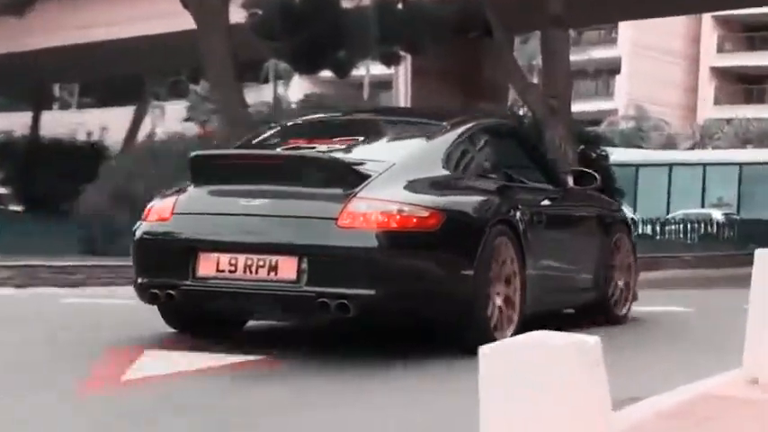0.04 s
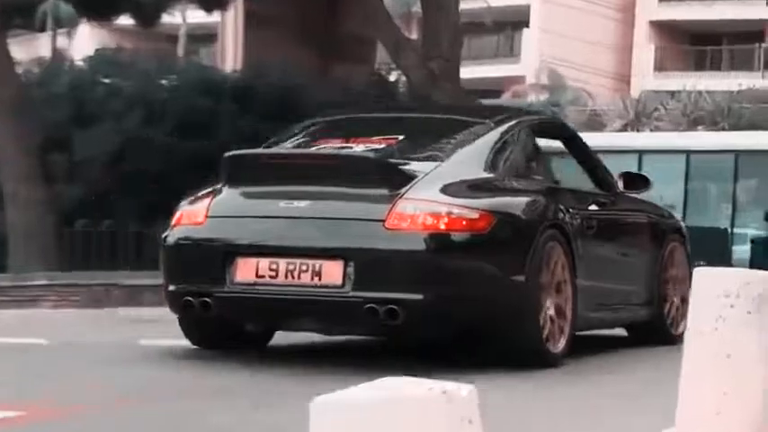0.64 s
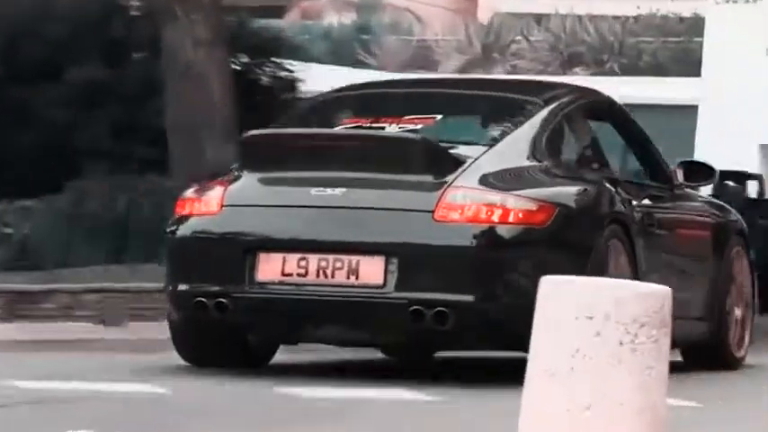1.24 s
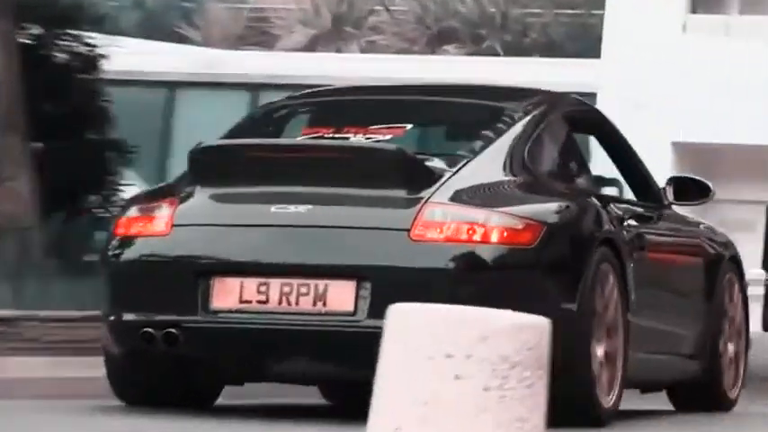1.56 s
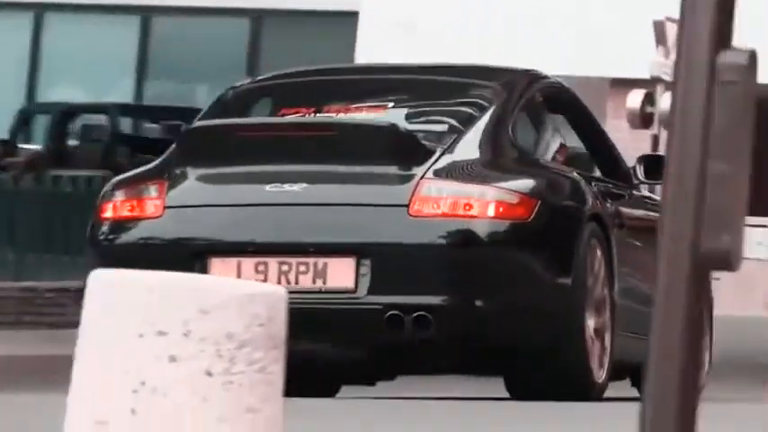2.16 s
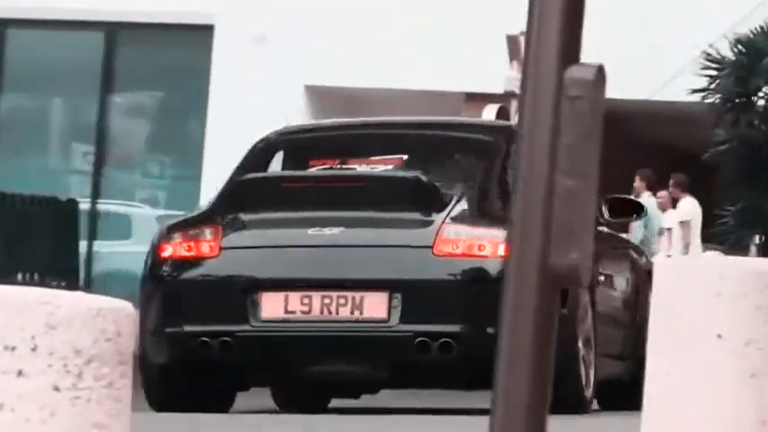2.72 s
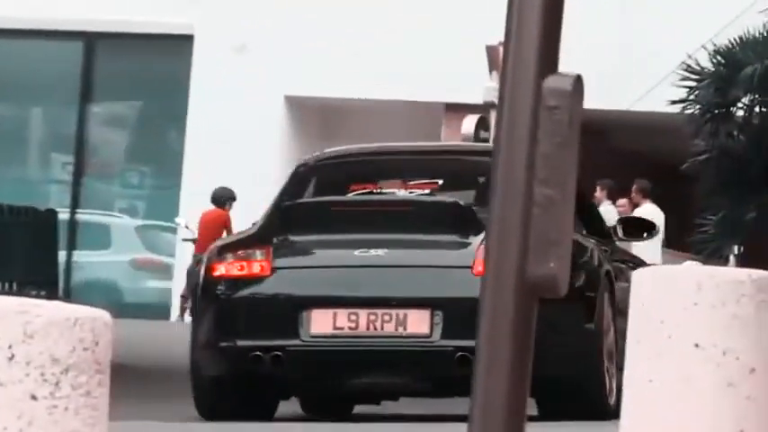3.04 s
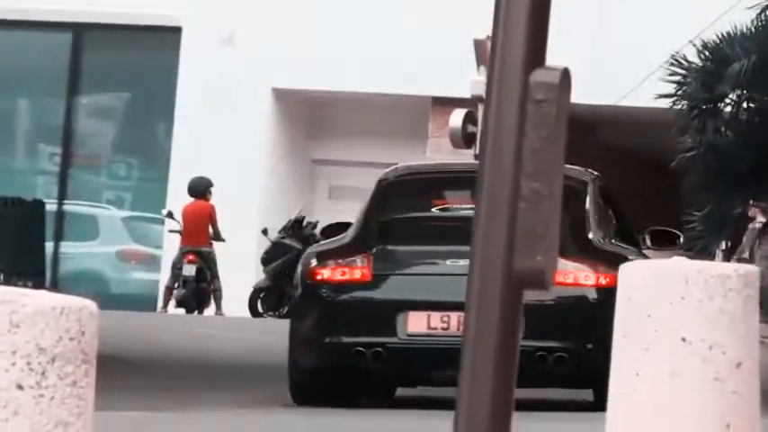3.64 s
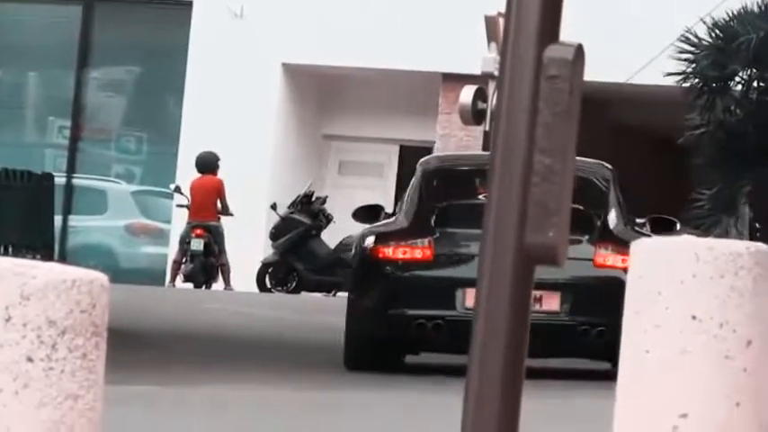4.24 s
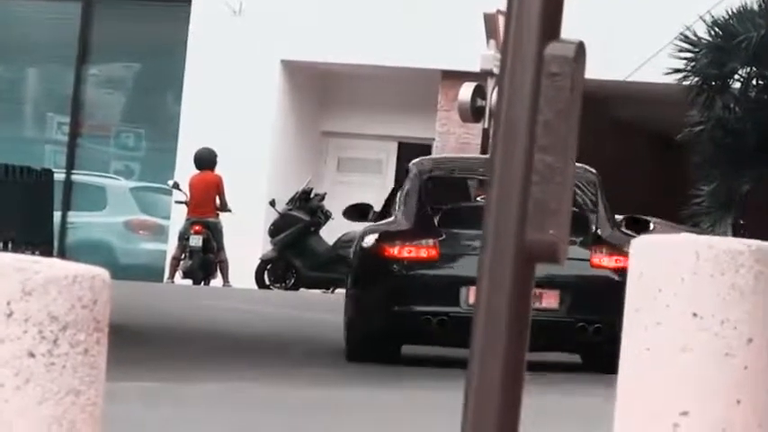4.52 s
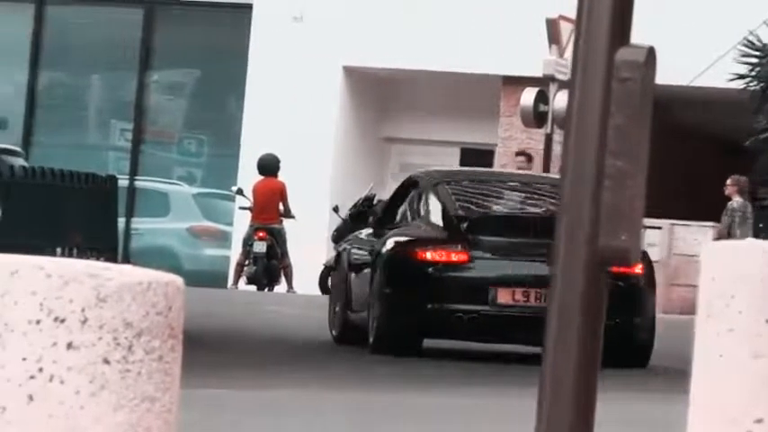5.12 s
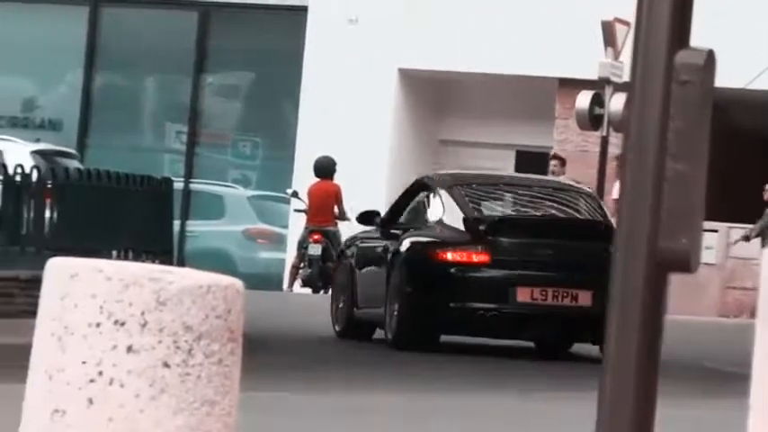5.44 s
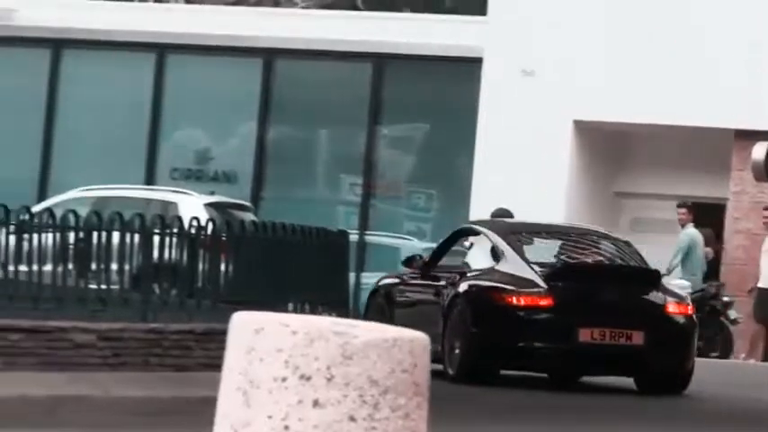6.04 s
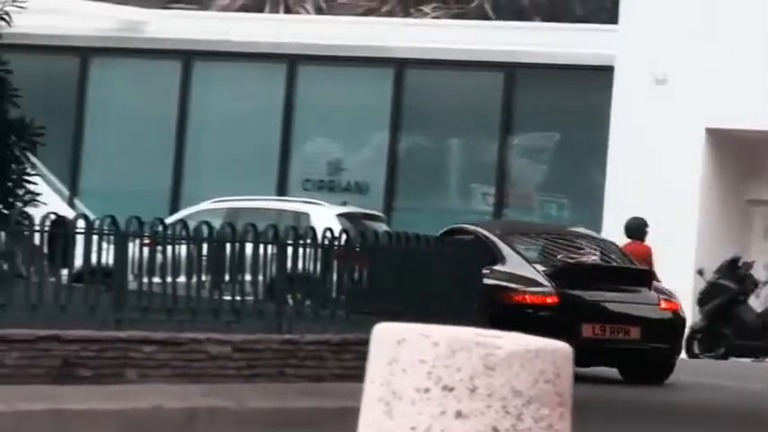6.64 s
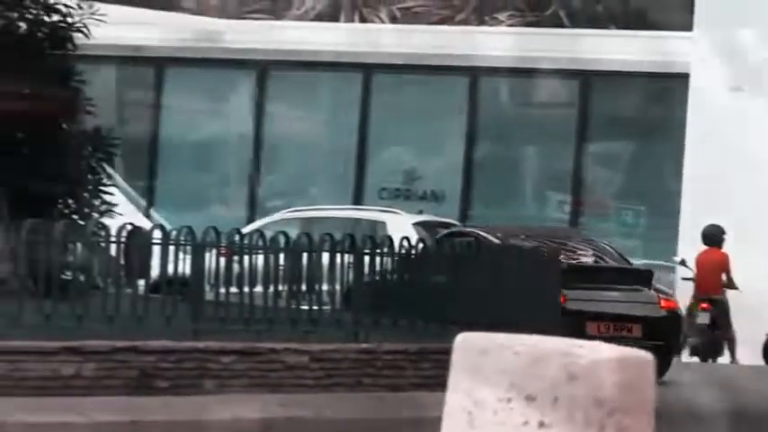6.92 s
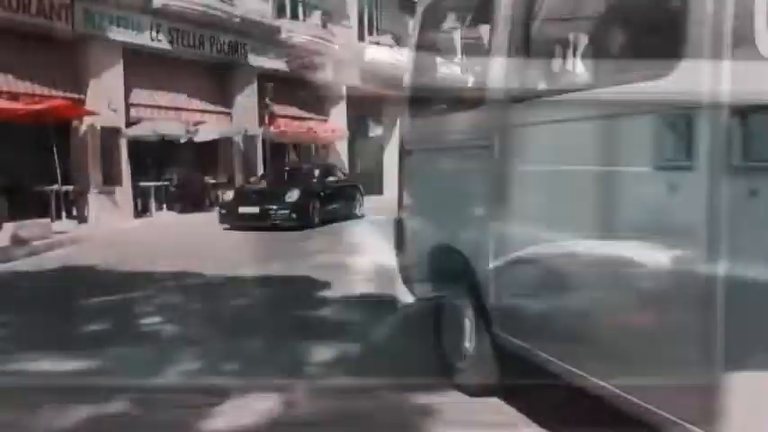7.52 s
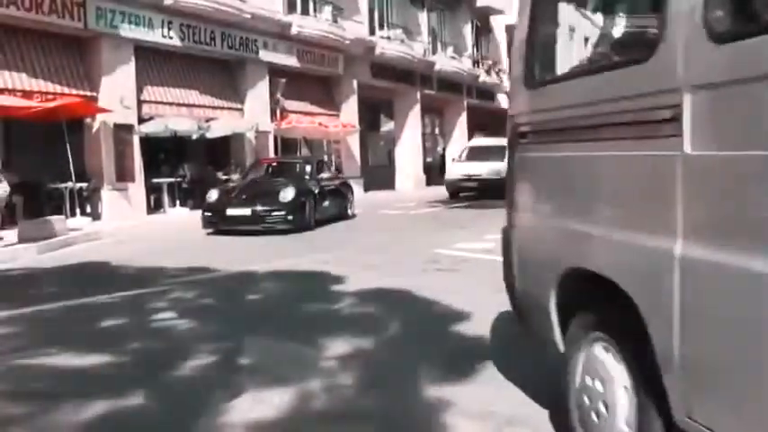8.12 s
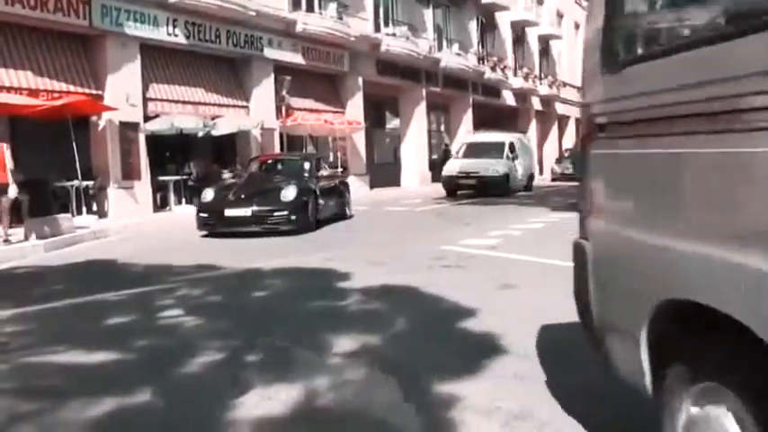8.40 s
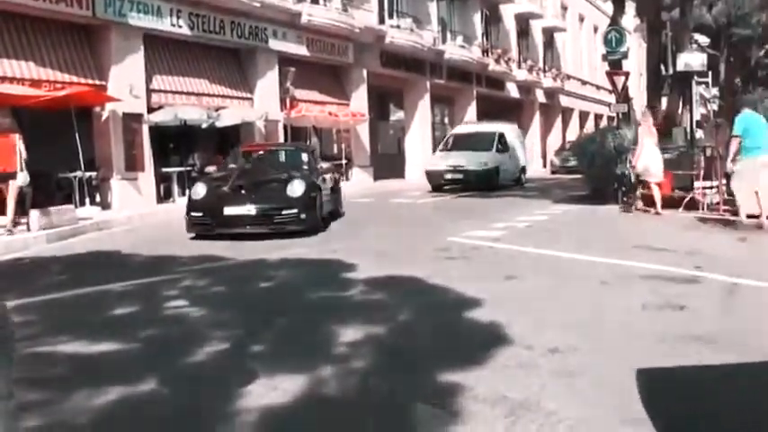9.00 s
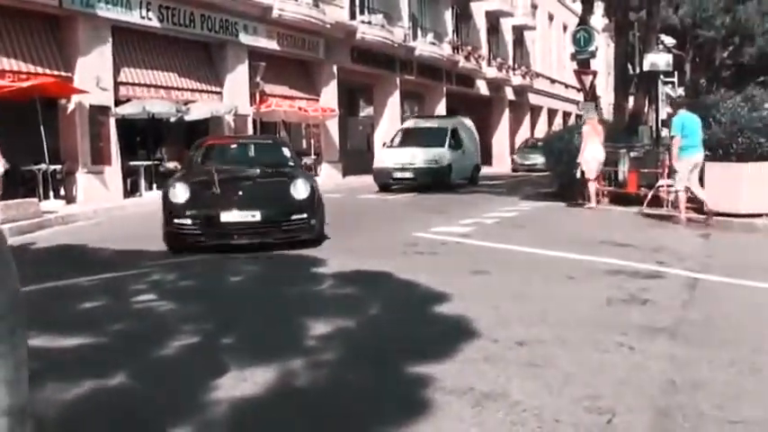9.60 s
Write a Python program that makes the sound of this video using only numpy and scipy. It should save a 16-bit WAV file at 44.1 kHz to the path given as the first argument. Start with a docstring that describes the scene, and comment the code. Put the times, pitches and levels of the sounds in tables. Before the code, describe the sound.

A sports car creeps along a city street, heard from the kerb. It pulls with a loud, raspy growl that echoes off the house fronts, then drops to a quiet burble with small pops. It pulls again at low revs, booming and crackling, and moves away. Traffic swells, and a van passes close by with engine drone, quick belt chirps and tyre noise. The car's low boom returns briefly at the end.

```python
"""A six-cylinder sports car creeps through a city street. First it pulls with a growl: its exhaust
pulses boom in the pipes, bark, rasp and echo off the house fronts. From 1.6 s it burbles and pops off
the throttle, just after 3 s it pulls again at low revs, then it moves away. Traffic swells from about
5 s, and around 8.4 s a van passes close by with engine drone, belt chirps and tyre noise.
In the last half second the car comes round again."""
import sys
import numpy as np
from scipy import signal
from scipy.fft import rfft, irfft
from scipy.io import wavfile
from scipy.ndimage import uniform_filter1d

SR = 44100
rng = np.random.default_rng(int(sys.argv[2]) if len(sys.argv) > 2 else 0)


def persist_wave(psi):
    """Save psi, clipped to +-1, as 16-bit WAV."""
    counts = np.round(np.clip(psi, -1, 1) * 32767).astype(np.int16)
    wavfile.write(sys.argv[1], SR, np.atleast_2d(counts).T)


N = 434826

# fader ride on the exhaust's note and throb: t/s, level/dB
EXHAUST_FADER = [(0, -15), (.16, -11), (.35, -18.5), (1, -7.5), (1.585, -13), (1.625, -22), (1.78, -34),
                 (2.05, -33), (2.35, -31.5), (2.9, -33), (3.25, -22), (3.45, -12.5), (3.7, -6),
                 (3.87, -10.5), (4.02, -9), (4.6, -12.5), (5.4, -15), (5.52, -17.5), (5.9, -18.5),
                 (6.3, -19), (6.8, -18), (7.5, -22), (8.3, -23.5), (9.1, -27.5), (9.65, -17)]
# the driver's foot: t/s, throttle/0-1
THROTTLE = [(0, 0.79), (.3, 0.59), (.7, 0.88), (.95, 0.93), (1.24, 0.88), (1.42, 0.72), (1.57, 0.58),
            (1.63, 0.33), (2.3, 0), (2.85, 0.15), (3.2, 0.57), (3.65, 0.82), (3.9, 0.59), (4.6, 0.66),
            (4.68, 0.9), (5.02, 0.92), (5.4, 0.64), (5.55, 0.4), (7.4, 0), (9.86, 0.73)]
# reverb of bark and rasp, wettest during the low-rev pull: t/s, tail re direct/dB
REVERB_SEND = [(0, -6.5), (1.6, -5), (3.4, 2), (4.6, 9), (6, -8), (9.86, -3)]
# the engine catches (+) or misses (-) for a few firings: t/s, level change/dB
STUMBLES = [(1.63, -3), (1.695, 5), (1.765, -3), (1.895, 7), (1.955, -2), (3.05, 5), (3.14, 6), (3.24, -7),
            (5.48, -6), (5.735, -3), (6.33, -6), (6.97, -4)]
# accent of each cylinder in firing order, banks alternating: excess strength/ratio
CYLINDER_ACCENTS = [0.38, -0.1, 0.39, 0.068, 0.34, -0.24]
def sports_car(ragged_below=.44, stumble_s=.021, weak_bank=.4, clearing_db=4):
    """Each firing sends a pulse down the pipe; an open throttle barks and rasps, a shut one burbles."""
    rate = engine_speed()
    level_db, = in_time(EXHAUST_FADER)
    throttle, = in_time(THROTTLE)
    send_db, = in_time(REVERB_SEND)
    stumble_db = sum(db * swell(s, stumble_s) for s, db in STUMBLES)
    # combustion crossfades from clean (0) to ragged (1) as the throttle shuts
    ragged = .5 + .5 * np.tanh((ragged_below - throttle) / .1)
    spread = .14 + .38 * ragged
    note_db = -1.46 - 1.04 * ragged
    throb_db = -13.5 + 4.5 * ragged
    imbalance_db = -3.5 + 1.5 * ragged
    turns = 1.25 + np.cumsum(rate) / SR   # one turn per firing
    firing = turns.astype(int)
    onsets = np.searchsorted(firing, np.arange(firing[-1] + 1))
    age = (turns - firing) / rate
    scatter = spread[onsets] * rng.standard_normal(2000)[:len(onsets)]
    excess = np.resize(CYLINDER_ACCENTS, len(onsets)) + scatter
    strength = 1 + .5 * np.tanh(2 * excess * from_db(imbalance_db[onsets]))
    lumps, pulses = np.zeros(N), np.zeros(N)
    lumps[onsets], pulses[onsets] = excess, strength
    note = from_db(level_db + stumble_db + note_db) * exhaust_note(rate, turns, spread, throttle, ragged)
    throb = from_db(level_db + stumble_db + throb_db) * pipe_throb(lumps)
    barking = bark(pulses, strength[firing], age, spread, throttle) * from_db(.6 * stumble_db)
    snarling = tip_snarls(pulses, strength[firing], age, bank=np.where(firing % 2, weak_bank, 1))
    rasping = rasp(pulses, strength[firing], age, throttle)
    duck = from_db(-clearing_db * high_revs(rate))   # bark and throb recede behind the growl
    boom = pop_ducking() * (note + facades(duck * throb))
    return boom + snarling + facades(duck * barking + rasping, send_db)


# the car's rev curve: t/s, firing rate/Hz
REVS = [(0, 108.6), (.072, 107.7), (.16, 103.2), (.386, 82.5), (.666, 92.4), (.936, 100.1), (1.282, 107.9),
        (1.478, 109.6), (1.58, 107.8), (1.92, 92), (2.33, 64.7), (2.8, 48.2), (3.05, 57), (3.25, 64),
        (3.46, 59.7), (4, 61.3), (4.55, 63), (4.68, 66.3), (4.85, 66.3), (5.1, 69), (5.41, 70.8),
        (5.68, 62), (6.04, 48), (6.31, 43.6), (6.78, 46), (7.2, 43.5), (7.6, 59.5), (8.25, 72.4), (9, 49),
        (9.68, 50), (9.86, 55.5)]
def engine_speed(bite_s=3.125, period_s=.27, decay_s=.6, swing_hz=6.5):
    """Firings per second; the drive line shunts as the clutch bites and swings the revs."""
    rate, = in_time(REVS)
    age = np.maximum(np.arange(N) / SR - bite_s, 0)
    return rate + swing_hz * np.exp(-age / decay_s) * np.sin(2 * np.pi * age / period_s)


def high_revs(rate, above_hz=77, range_hz=3):
    """Crossfade from low-rev drone (0) to clean growl (1)."""
    return .5 + .5 * np.tanh((rate - above_hz) / range_hz)


# the exhaust system's EQ at low revs and at high revs: f/Hz, gain/dB
DRONE_EQ = [(45, -13), (62, -18), (69, -10.5), (82, -4), (98, -1), (110, -2.5), (124, -4), (138, -2.5),
            (165, -3), (186, 11), (193, 7.5), (199, -3.5), (210, -4), (222, 2.5), (245, 1.5), (270, 5),
            (300, 1.5), (330, -9), (365, -2), (405, -15), (460, -6), (545, -14.5), (605, -3.5), (660, -6),
            (710, -7.5), (800, -11), (1000, -12)]
GROWL_EQ = [(80, -1), (105, 0), (165, -2), (210, 2), (250, 4.5), (285, 1), (320, -3), (365, 2.5),
            (410, -4.5), (450, -2), (520, -2.5), (620, 2), (700, 2.5), (1100, -1)]
# balance of orders 1, 1.5 .. 11; the unequal banks sound the half orders: relative level/dB
DRONE_ORDERS = [1, -26, -3.5, -22, -7.5, -21, -10, -22.5, -12, -30, -13.5, -25, -22.5, -24, -19, -30, -19.5,
                -32, -24, -34.5, -26]
GROWL_ORDERS = [-1.5, -14, -1, -13, -9, -15.5, -17, -19, -19, -27, -20.5, -23.5, -23, -28, -23.5, -29,
                -24.5, -28, -26, -29, -28]
def exhaust_note(rate, turns, spread, throttle, ragged, lag_s=.0013, dull_hz=180, db_per_octave=11):
    """The mean pulse pushes, then sucks: its orders drone or growl, and wander when firing is ragged."""
    orders = 1 + np.arange(len(DRONE_ORDERS))[:, None] / 2
    hz, high = orders * rate, high_revs(rate)
    drone = eq_db(hz, DRONE_EQ) + np.array(DRONE_ORDERS)[:, None]
    growl = eq_db(hz, GROWL_EQ) + np.array(GROWL_ORDERS)[:, None]
    levels = drone + high * (growl - drone)
    # a shut throttle passes little gas: the firing order fades and the softer pulses lose their top
    levels[0] -= 7 * (1 - throttle) * (1 - high)
    levels -= db_per_octave * (1 - throttle) * np.maximum(np.log2(hz / dull_hz), 0)
    gains = from_db(levels)
    wander = .04 * ragged ** 2 * drift(9)
    angle = 2 * np.pi * (turns - rate * lag_s + wander)
    note = sum(gain * from_db(3.5 * spread * drift(14)) * np.sin(k * angle)
               for k, gain in zip(orders, gains))
    return -np.sqrt(2) * note / np.linalg.norm(gains, axis=0)


# exhaust pipe resonances: f/Hz, width/Hz, relative level/dB
PIPE_MODES = [(105, 33, -10), (189.7, 9.9, 13.5), (227, 13, 6), (298, 27, -5.5), (310, 24, -18)]
def pipe_throb(lumps, low_hz=76, top_hz=400):
    """Stronger and weaker firings burble in the pipe; its mouth radiates no deep bass."""
    ringing = cut(rings(lumps, PIPE_MODES), low_hz, "high")
    return evened(cut(ringing, top_hz, "low"))


# the bark's throaty EQ: f/Hz, gain/dB
BARK_EQ = [(250, -24), (330, 3), (430, -8.5), (520, -7.5), (620, 1), (700, 0.5), (870, -4.5), (1130, -7.5),
           (1330, -18.5), (1900, -23.5), (3300, -66), (6000, -100)]
def bark(pulses, strength, age, spread, throttle, puff_s=.007):
    """The steep pulse front and its turbulent puff bark; ragged firings puff harder."""
    puffs = (.06 + .8 * spread) * strength * np.exp(-age / puff_s) * noise()
    return by_throttle(throttle, full_db=-24.5, loss_db=18) * evened(colour(pulses + puffs, BARK_EQ))


# EQ of the gas jet's hiss: f/Hz, gain/dB
JET_EQ = [(710, -30), (1200, 2), (1270, -6.5), (1390, 1.5), (1510, -4), (1690, -1.5), (2330, -4),
          (2580, -6), (2800, -3.5), (4600, -11.5), (5190, -17), (9520, -29.5), (10800, -56.5), (14100, -79),
          (22000, -120)]
# tailpipe rings, low and metallic: f/Hz, width/Hz, relative level/dB
LOW_RINGS = [(1500, 140, -11.5), (1890, 300, 3.5), (2290, 250, 3)]
METAL_RINGS = [(2590, 52, -1), (2800, 85, -0.5), (3300, 200, -6), (3710, 300, -6), (4440, 410, -5)]
def rasp(pulses, strength, age, throttle, steady_jet=.57, gust_s=.0013, knock=.45):
    """The gas jet hisses with every firing; jet and pulse fronts set the tailpipes ringing."""
    gusts = steady_jet + strength ** 2 * np.exp(-age / gust_s)
    drive = evened(gusts * noise()) + knock * evened(pulses ** 2)
    hiss = evened(colour(gusts * noise(), JET_EQ))
    low = evened(cut(rings(drive, LOW_RINGS), [1300, 2900], "band"))
    metal = evened(cut(rings(drive, METAL_RINGS), [2100, 4900], "band", order=5))
    return (hiss * by_throttle(throttle, full_db=-32.5, loss_db=23.5)
            + low * by_throttle(throttle, full_db=-33, loss_db=42)
            + metal * by_throttle(throttle, full_db=-44.5, loss_db=13.5))


# snarl cues: middle t/s, half length/s, f/Hz, glide/(Hz/s), level/dB
SNARLS = [(0.048, 0.17, 2720, 0, -37.5), (0.3, 0.5, 3960, -1.5, -45.5), (.85, .2, 2590, 1, -42),
          (1.02, 0.16, 4150, 0, -44.5), (.93, .02, 2000, 0, -34), (1.18, 0.083, 1900, 1501, -30.5),
          (1.25, 0.04, 2480, 4500, -32.5), (1.472, .03, 1920, 3, -40), (4.833, 0.07, 3060, 0, -37),
          (4.987, 0.053, 1980, 0, -36), (5.04, 0.029, 2420, 0, -30), (4.98, 0.14, 3830, 1, -42)]
def tip_snarls(pulses, strength, age, bank, blast_s=.0013, leak=.07, knock=1.1, width_hz=750):
    """Pulse fronts and gas blasts, mostly from the strong bank, crackle in the tailpipe tips."""
    t = np.arange(N) / SR
    blasts = leak + bank * strength ** 2 * np.exp(-age / blast_s)
    drive = rms_one(blasts * noise()) + knock * rms_one(bank * pulses ** 2)
    return sum(from_db(db) * swell(s, half) * evened(glide(drive, hz + slope * (t - s), width_hz))
               for s, half, hz, slope, db in SNARLS)


# overrun pops and heavy firings: t/s, relative level/dB
POP_CUES = [(1.6585, -9), (1.6685, -12), (1.678, -8.5), (1.698, -7.5), (1.7075, -7.5), (1.802, -20),
            (1.812, -19), (1.855, -13), (1.866, -14), (1.8895, -12), (1.899, -14), (2.011, -19),
            (2.023, -19), (2.044, -17), (2.094, -19), (2.146, -22), (2.203, -21), (2.335, -22),
            (2.357, -21), (2.445, -20), (2.515, -20), (2.63, -22), (2.989, -17), (3.036, -12), (3.046, -13),
            (3.0675, -9.5), (3.112, -15), (3.1435, -12), (3.1715, -15), (3.2865, -14), (3.297, -12),
            (3.323, -10), (4.645, -2), (4.675, -2), (4.735, -1), (4.765, -1.5), (4.826, -3), (4.8555, -3.5),
            (4.945, -4), (5.12, -5), (5.209, -5), (5.379, -3.5), (5.51, -6), (5.556, -3.5), (5.5865, -4.5),
            (5.6325, -5), (5.667, -9), (5.6785, -5), (5.71, -3.5), (5.7745, -9), (5.785, -10),
            (5.845, -4.5), (5.862, -5.5), (5.937, -9), (6.086, -8)]
# the body of a pop: f/Hz, t60/s, relative level/dB
POP_MODES = [(205.4, 0.033, 1.5), (187.5, 0.12, -13.5), (286, .025, -9), (115, 0.032, -12.5)]
def pops(thump_db=-.5, crack_db=-20, crack_s=.0027, rise_s=.0013):
    """Late-burning fuel thumps once in the pipe and dies quickly, with a short dull crack."""
    kicks, age = np.zeros(N), np.arange(5000) / SR
    for s, db in POP_CUES:
        kicks[int(s * SR)] = from_db(db)
    thump = sum(from_db(db - 60 * age / t60) * np.sin(2 * np.pi * hz * age) for hz, t60, db in POP_MODES)
    thump *= 1 - np.exp(-age / rise_s)
    thumps = cut(signal.oaconvolve(kicks, thump / np.abs(thump).max())[:N], 45, "high", order=1)
    decays = signal.lfilter([1], [1, -np.exp(-1 / (crack_s * SR))], kicks + 1e-18)
    crack = cut(colour(decays * noise(), BARK_EQ), 1700, "low", order=4)
    return from_db(thump_db) * thumps + from_db(crack_db) * facades(crack)


def pop_ducking(depth=.75):
    """A pop takes the place of a regular firing, so the boom ducks around it."""
    marks = np.zeros(N)
    marks[[int(s * SR) for s, _ in POP_CUES]] = 1
    return 1 - depth * np.clip(signal.oaconvolve(marks, np.hanning(1100), "same"), 0, 1)


# hard firings: t/s, f/Hz, level/dB
CRACK_CUES = [(1.284, 900, -15), (1.312, 720, -9), (1.423, 800, -11), (1.45, 950, -9), (1.479, 800, -9),
              (1.496, 800, -11), (1.514, 770, -10.5), (1.532, 780, -12), (1.551, 780, -7),
              (1.628, 700, -18), (1.854, 650, -11), (4.118, 900, -12.5), (4.66, 720, -5.5),
              (4.688, 680, -12), (4.718, 720, -8), (4.749, 720, -12), (4.779, 700, -10), (4.944, 750, -10),
              (5.003, 900, -8)]
def cracks(width_hz=330, spit=.052, spit_s=.0013, size=2000):
    """A hard firing rings the tailpipe once and spits a little gas."""
    out, age = np.zeros(N + size), np.arange(size) / SR
    for s, hz, db in CRACK_CUES:
        ring = np.exp(-np.pi * width_hz * age) * np.sin(2 * np.pi * hz * age)
        gas = spit * np.exp(-age / spit_s) * rng.standard_normal(size)
        out[int(s * SR):int(s * SR) + size] += from_db(db) * (ring + gas)
    return facades(cut(out[:N], [450, 4500], "band"))


# the van's pass-by: t/s, firing rate/Hz, level/dB
VAN_PASS = [(0, 44, -92), (6.6, 44, -60.5), (7.4, 39, -35.5), (8, 39.7, -29), (8.55, 46.6, -24),
            (8.85, 45.4, -22.5), (9.15, 47.5, -21.5), (9.5, 48.6, -24), (9.86, 48.5, -23)]
# harmonics of its drone: order, relative level/dB
VAN_ORDERS = [(1, -9), (2, -13.5), (3, -14.5), (4, -15), (5, -1.5), (6, -3), (7, -13), (8, -12.5), (9, -15),
              (11, -12)]
def van(waver_db=2.5, wobble=.00389):
    """The van's engine drones in its silencer; also returns its firing phase (0-1)."""
    rate, db = in_time(VAN_PASS)
    turns = np.cumsum(rate * (1 + wobble * drift(8))) / SR
    drone = sum(from_db(level + waver_db * drift(6)) * np.sin(2 * np.pi * (k * turns + rng.random()))
                for k, level in VAN_ORDERS)
    return np.sqrt(2) * from_db(db) * drone, turns % 1


# chirp cues: t/s, level/dB
BELT_CHIRPS = [(8.045, -22), (8.1, -26), (8.17, -23.5), (8.255, -23), (8.35, -21), (8.56, -27), (8.66, -24),
               (8.76, -34), (8.88, -28)]
def belt(hz=1305, width_hz=70, half_s=.011):
    """The van's belt chirps about ten times a second as it passes."""
    tone = evened(narrow_noise(hz, width_hz), size=400)
    return tone * sum(from_db(db) * swell(s, half_s) for s, db in BELT_CHIRPS)


# fader ride on the road noise, loudest as the van goes by: t/s, level/dB
ROAD_FADER = [(0, -92.5), (4.6, -43.5), (5.35, -34.5), (5.9, -32), (6.75, -29), (7.35, -30.5),
              (7.92, -24.5), (8.35, -23.5), (8.75, -24.5), (9.86, -27.5)]
# engine rumble, body drone: low f/Hz, high f/Hz, level at fader top/dB, fader share, silencer lift/dB
RUMBLE_BANDS = [(35, 87, -29.5, 0.43, 4), (90, 358, -22, 0.27, 7.5)]
# tyre roar, hiss and sizzle: low f/Hz, high f/Hz, level re fader/dB, clear of the corner t/s
TYRE_BANDS = [(415, 1510, 1, 4.1), (1650, 5220, -2.5, 5.65), (5190, 11000, -14, 6.58)]
def traffic(van_cycle, clatter=.29, rumble_clear_s=3.5):
    """Engines rumble and tyres hiss round the corner, treble last; the van's firings chop the hiss."""
    road_db, = in_time(ROAD_FADER)
    swing_db = road_db - road_db.max()
    silencer = swell(middle=8.38, half=.12)   # the van's silencer goes by
    rumble = sum(traffic_band(low, high, db + share * swing_db + lift * silencer, rumble_clear_s)
                 for low, high, db, share, lift in RUMBLE_BANDS)
    tyres = sum(traffic_band(low, high, db + road_db, clear_s) for low, high, db, clear_s in TYRE_BANDS)
    chop = rms_one(1 + clatter * np.exp(-4 * van_cycle) * (1 + .69 * drift(40)))
    return rumble + chop * tyres


# EQ of the passing traffic: f/Hz, gain/dB
TRAFFIC_EQ = [(15, -43), (25, -6), (99, 1.5), (148, -0.5), (181, 1.5), (279, -6.5), (351, -7.5),
              (501, -9.5), (583, -11.5), (970, -13), (1280, -12), (1650, -22.5), (4930, -34.5), (9540, -51),
              (10800, -57), (14100, -82), (22000, -120)]
def traffic_band(low_hz, high_hz, db, clear_s, shadow_db_per_s=9, flicker_db=.5):
    """One flickering band of traffic noise, shadowed by the corner until clear_s."""
    shadow_db = shadow_db_per_s * np.maximum(clear_s - np.arange(N) / SR, 0)
    band = rms_one(cut(colour(noise(), TRAFFIC_EQ), [low_hz, high_hz], "band", order=4))
    return band * from_db(db - shadow_db + flicker_db * drift(12))


# passing tones: middle t/s, half length/s, f/Hz, width/Hz, relative level/dB
PASSING_TONES = [(6.17, 0.16, 3930, 200, -43), (6.35, 0.17, 3260, 70, -41), (6.02, 0.11, 3100, 110, -41),
                 (6.49, 0.43, 564, 14, -35), (6.4, 0.36, 4580, 810, -41), (6.72, .2, 4430, 590, -44),
                 (7.3, .45, 4800, 200, -50), (6.9, 0.21, 184.7, 8, -24.5), (7.61, 0.17, 504, 9.2, -35.5),
                 (8.1, 0.39, 2887, 340, -37.5), (8.162, 0.22, 382.3, 18, -31), (8.3, 0.33, 5060, 380, -44),
                 (8.41, .09, 5005, 70, -40.5), (8.56, .25, 1190, 186, -33), (9.663, 0.059, 101.1, 8, -16.5),
                 (9.667, 0.051, 1100, 19, -30)]
def passing_tones(trim_db=1.5, flutter_db=1.8):
    """Fluttering tones swell and fade: whines and squeals, and the car's low engine boom near the end."""
    out = 0
    for middle, half, hz, width, db in PASSING_TONES:
        tone = evened(narrow_noise(hz, width))
        out += from_db(db + trim_db + flutter_db * drift(16)) * swell(middle, half) * tone
    return out


# EQ of the city bed: f/Hz, gain/dB
STREET_EQ = [(18, -42), (30, -19), (122, -11.5), (181, 1.5), (312, -12), (474, -21.5), (653, -20),
             (815, -21), (968, -16), (1660, -30), (1930, -28.5), (2470, -29.5), (4460, -42), (8060, -52),
             (10800, -76.5), (14100, -106), (22000, -120)]
def street(level_db=-28.5, waver_db=1.3, low_hz=48):
    """The far, even murmur of city traffic."""
    gain = from_db(level_db + waver_db * drift(5))
    return gain * rms_one(cut(colour(noise(), STREET_EQ), low_hz, "high"))


# slapbacks off the house fronts: delay t/s, level/dB
SLAPBACKS = [(0.0099, -9.5), (0.03, -15), (.046, -20.5), (0.071, -19), (0.102, -12.5)]
def facades(x, tail_db=-15, t60=.86, dull_hz=4500, size=22050):
    """The street walls add a few dull echoes and a diffuse tail."""
    tail = rng.standard_normal(size) * from_db(-60 * np.arange(size) / SR / t60)
    slaps = np.zeros(size)
    for s, db in SLAPBACKS:
        slaps[int(s * SR)] = from_db(db)
    wet = from_db(tail_db)
    diffuse = wet * signal.oaconvolve(x, tail / np.linalg.norm(tail))[:N]
    echoes = signal.oaconvolve(x, slaps)[:N]
    return (x + cut(diffuse + echoes, dull_hz, "low")) / np.sqrt(1 + wet ** 2)


def by_throttle(throttle, full_db, loss_db):
    """Gain of a layer that fades as the throttle shuts."""
    return from_db(full_db - loss_db * (1 - throttle))


def from_db(db):
    """Decibels to gain."""
    return 10 ** (np.asarray(db) / 20)


def rms_one(x):
    """Scale to unit power."""
    return x / np.sqrt(np.mean(x ** 2) + 1e-20)


def evened(x, size=5000):
    """Leveller: hold the running power at one."""
    return x / np.sqrt(uniform_filter1d(uniform_filter1d(x ** 2, size), size) + 1e-12)


def in_time(rows):
    """One value per sample for each column of an automation curve."""
    s, *columns = np.transpose(rows)
    return [np.interp(np.arange(N) / SR, s, c) for c in columns]


def swell(middle, half):
    """A bell-shaped fade in and out, height one."""
    return np.exp(-((np.arange(N) / SR - middle) / half) ** 2 / 2)


def noise():
    """White noise."""
    return rng.standard_normal(N)


def narrow_noise(hz, width):
    """Noise rung twice through one resonance: a breathy tone."""
    return resonate(resonate(noise(), hz, width), hz, width)


def drift(rate):
    """Slow random modulation at unit power."""
    knots = rng.standard_normal(4000)
    return rms_one(np.interp(np.arange(N) / SR * rate * 2, np.arange(len(knots)), knots))


def cut(x, hz, kind, order=2):
    """Butterworth filter."""
    return signal.sosfilt(signal.butter(order, hz, kind, fs=SR, output="sos"), x)


def eq_db(hz, eq):
    """Read an EQ curve along a log frequency axis."""
    knots_hz, db = np.transpose(eq)
    return np.interp(np.log(hz), np.log(knots_hz), db)


def colour(x, eq, size=4096):
    """Minimum-phase filter with the given EQ curve."""
    grid = np.maximum(np.arange(size + 1) * SR / (2 * size), 1)
    cepstrum = irfft(np.log(from_db(eq_db(grid, eq))))
    cepstrum[1:size] *= 2
    cepstrum[size + 1:] = 0
    return signal.oaconvolve(x, irfft(np.exp(rfft(cepstrum)))[:size])[:N]


def resonate(x, hz, width):
    """One resonance with peak gain one."""
    r = np.exp(-np.pi * width / SR)
    feedback = [1, -2 * r * np.cos(2 * np.pi * hz / SR), r * r]
    return signal.lfilter(np.array([1, 0, -1]) * (1 - r * r) / 2, feedback, x + 1e-18)


def rings(x, modes):
    """Resonances in parallel."""
    return sum(from_db(db) * resonate(x, hz, width) for hz, width, db in modes)


def glide(x, hz, width):
    """A resonance whose centre moves."""
    carrier = np.exp(2j * np.pi * np.cumsum(hz) / SR)
    return np.real(carrier * cut(x * carrier.conj() + 1e-18, width / 2, "low"))


def scene():
    """Car, van, traffic and city bed meet in mono at the kerb."""
    drone, van_cycle = van()
    car = sports_car() + pops() + cracks()
    return (car + drone + belt() + traffic(van_cycle) + passing_tones() + street())[None]


def record(dry, ceiling=.83, cutoff_hz=10900):
    """A soft clip rounds the loudest pulses and a steep low-pass cuts the top."""
    rounded = dry / (1 + (dry / ceiling) ** 6) ** (1 / 6)
    return signal.sosfilt(signal.ellip(10, .2, 80, cutoff_hz, fs=SR, output="sos"), rounded)


dry = scene()
out = record(dry)
persist_wave(out)
```